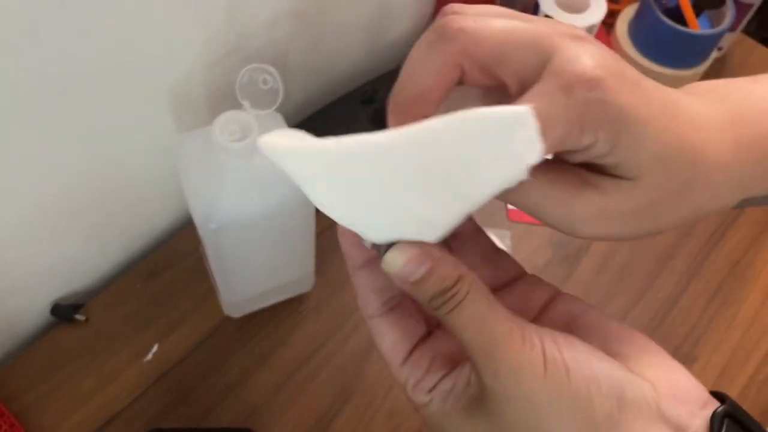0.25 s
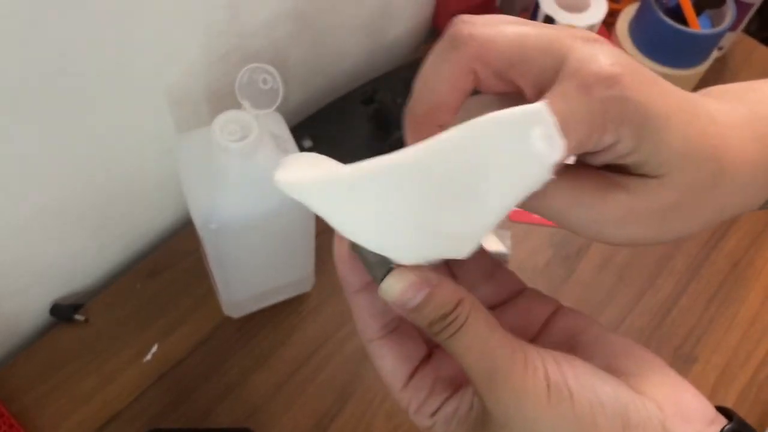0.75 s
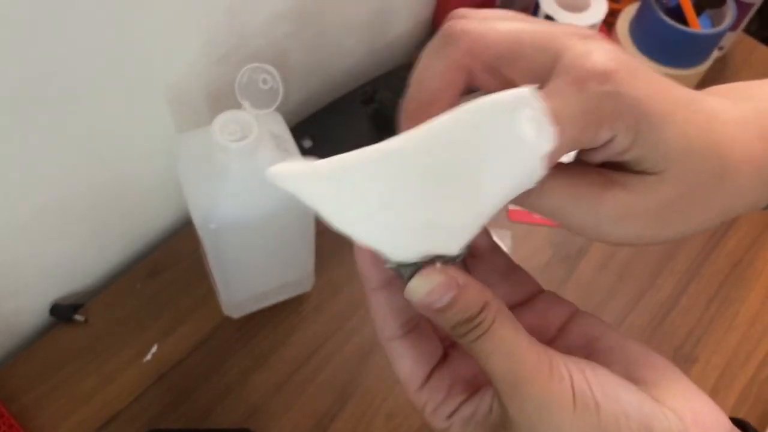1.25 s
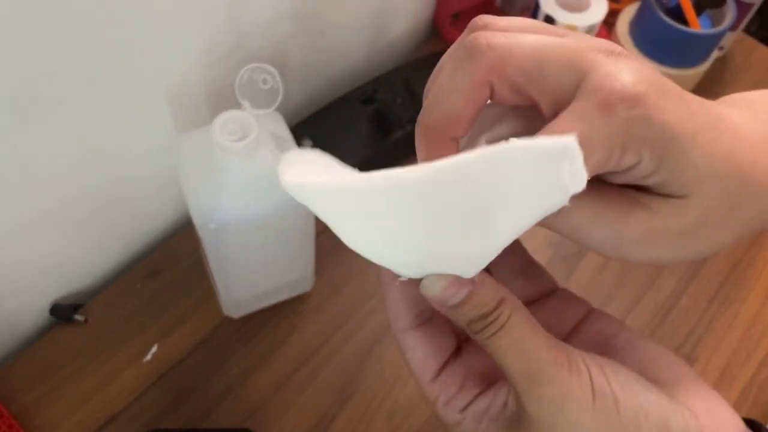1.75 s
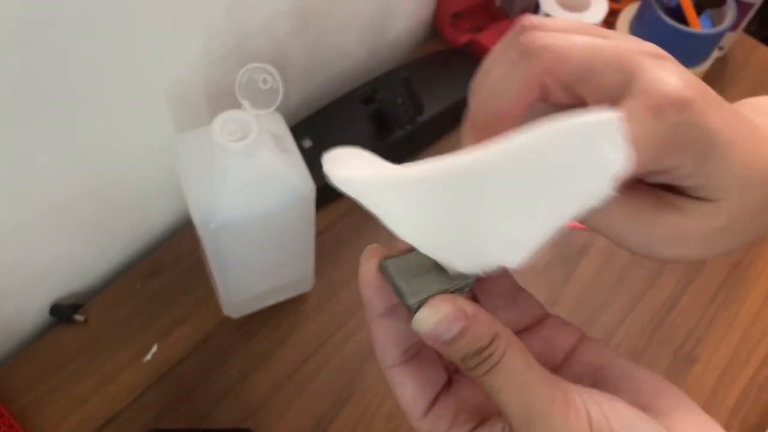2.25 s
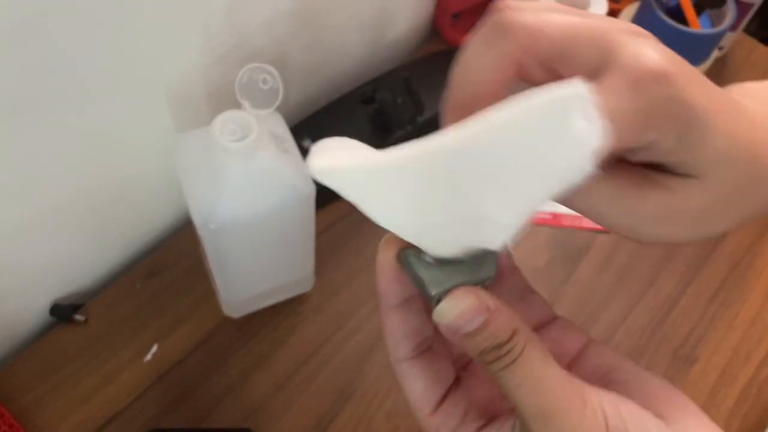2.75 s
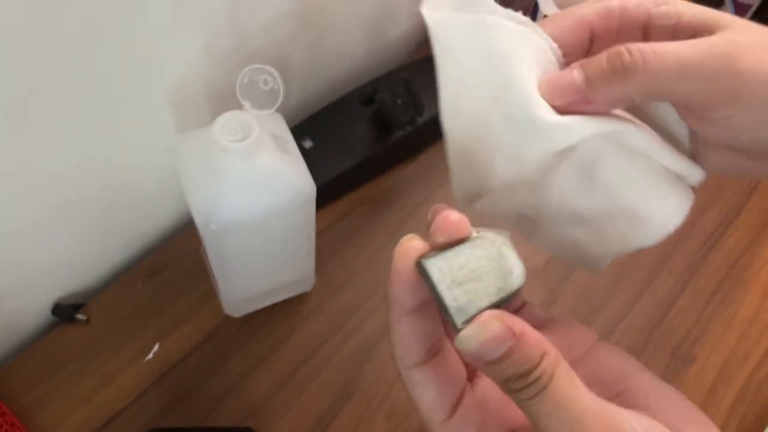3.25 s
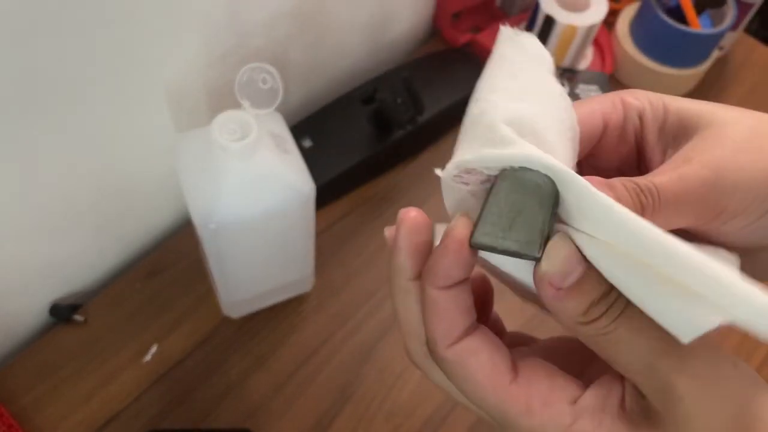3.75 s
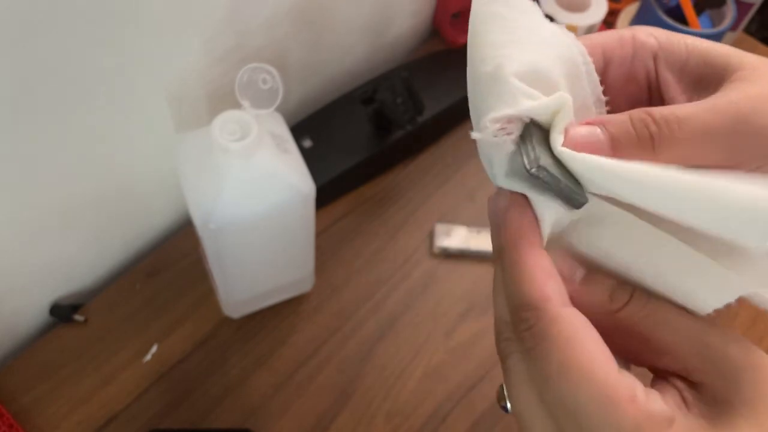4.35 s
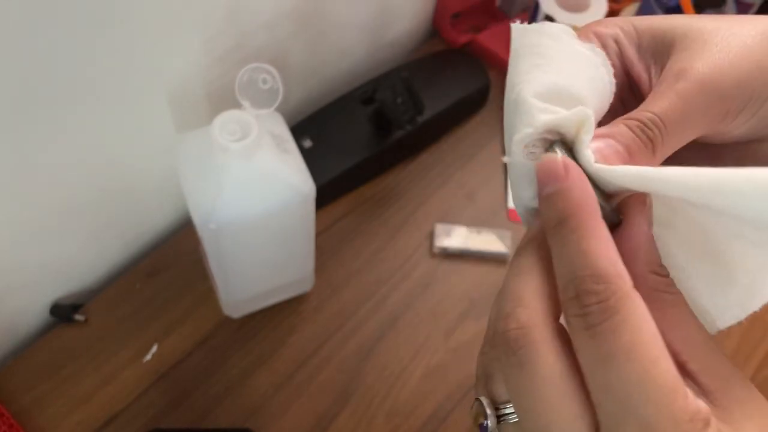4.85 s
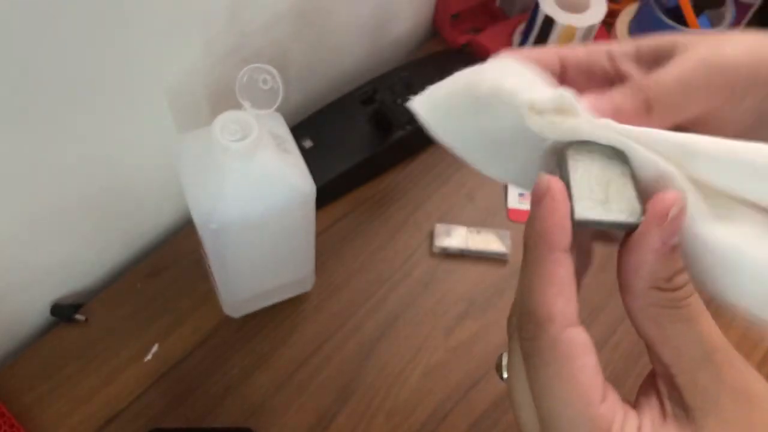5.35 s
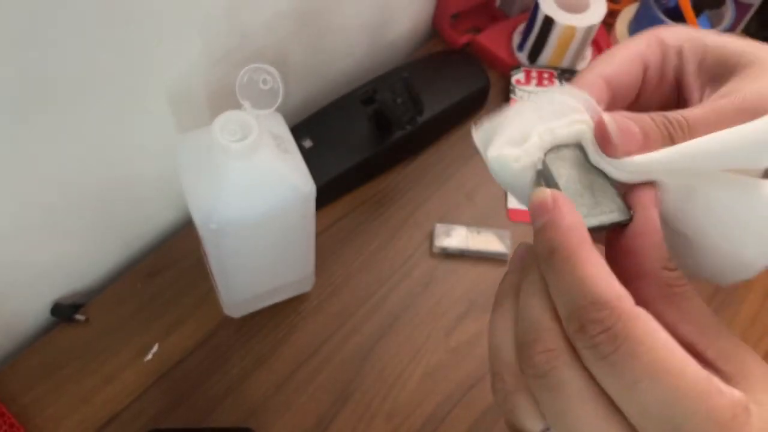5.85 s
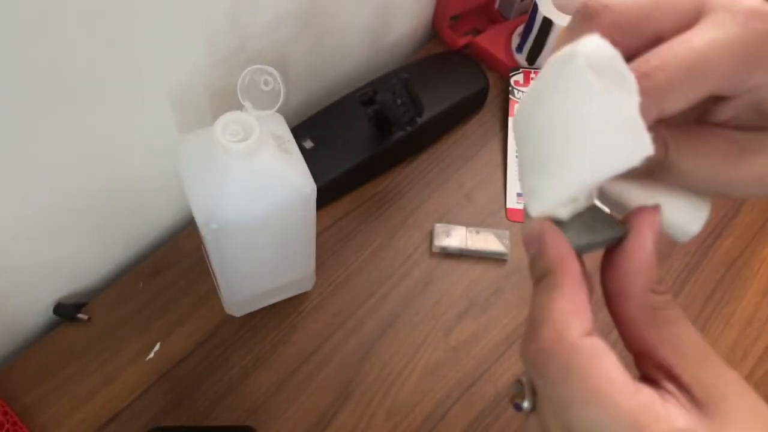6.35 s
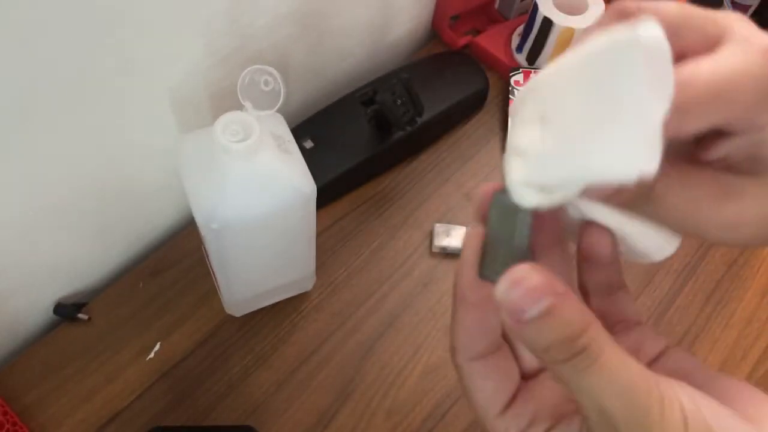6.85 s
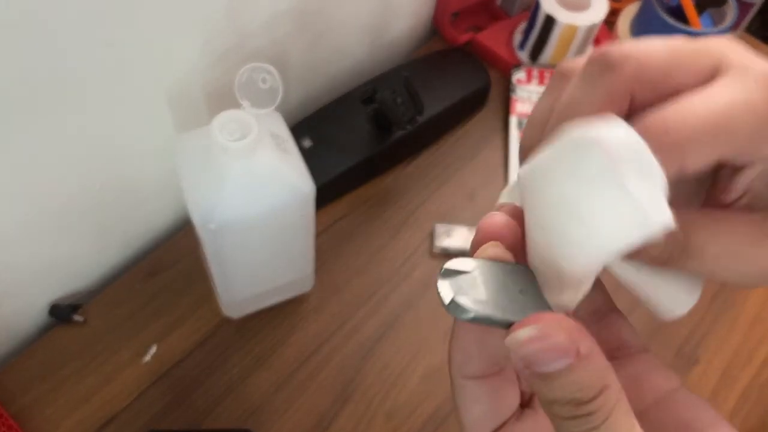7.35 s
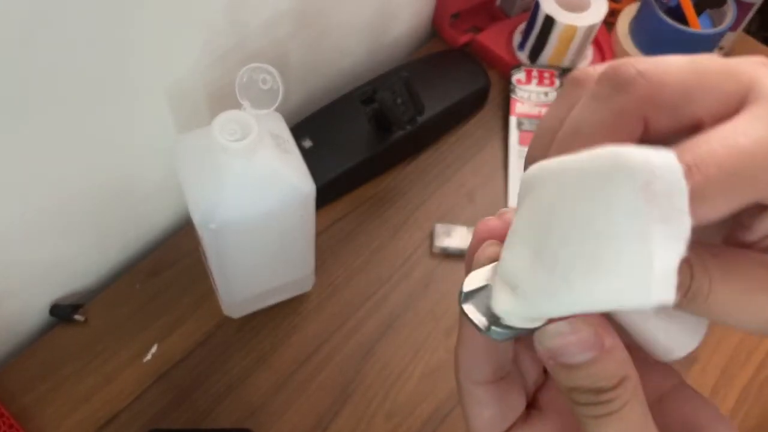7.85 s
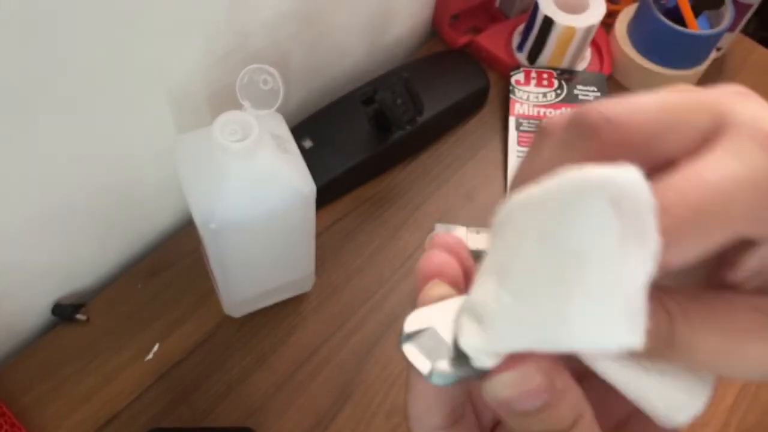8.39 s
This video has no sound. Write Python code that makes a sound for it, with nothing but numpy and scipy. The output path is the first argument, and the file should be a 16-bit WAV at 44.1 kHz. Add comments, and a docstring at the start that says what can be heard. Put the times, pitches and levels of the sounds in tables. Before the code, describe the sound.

A damp cloth scrubs a small metal piece in quick, jerky strokes close up, while an engine drones unevenly beyond the wall.

```python
"""Wet towel on metal, with an engine outside

A wet paper towel scrubs a small metal piece close to a phone: jerky noise, swelling with each stroke.
Short noise bursts make sharp paper snaps and a few low scuffs; fingers knock on the metal as dull thuds.
Beyond the wall an engine drones unevenly, made of wavering sines; a deeper boom joins late.
Filtered noise makes the low rumble, the soft swells of the moving hands and the faint room hiss.
"""
import sys
import numpy as np
from scipy import signal
from scipy.fft import rfft, irfft, next_fast_len
from scipy.io import wavfile
from scipy.ndimage import uniform_filter1d, map_coordinates

SR = 44100
rng = np.random.default_rng(int(sys.argv[2]) if len(sys.argv) > 2 else 0)


def unload_wav(signal):
    """Save mono or channel-first audio to the path in sys.argv[1] as 16-bit WAV at rate SR, clipped to [-1, 1]."""
    wavfile.write(
        sys.argv[1],
        SR,
        np.round(np.clip(np.atleast_2d(signal).T, -1, 1) * 32767).astype(np.int16),
    )


N = 380141

# Rubbing strokes: start t/s, length/s, level/dB, sheet voice against the fibres/dB,
# lean (change of level from start to end)/dB
STROKES = [(-.02, .14, -70, 0.5, 5), (.074, 0.078, -51, -7, -10.5), (0.205, 0.12, -62, -1, -11),
           (0.282, 0.061, -52.5, .5, 10), (0.329, .16, -56, -4.5, -22), (0.485, .1, -58.5, -4.5, 20),
           (0.613, 0.098, -60.5, -4.5, -11), (0.742, 0.069, -64.5, -1, 7), (0.845, 0.084, -63, -5, -2),
           (0.969, .092, -59, -1.5, 5), (1.084, .1, -57, -10, -4), (1.212, .1, -55, -0.5, 7),
           (1.341, 0.1, -57, -8, -6), (1.479, 0.11, -58, -0.5, 5), (1.604, .11, -58, -4.5, 1),
           (1.757, 0.096, -57.5, -0.5, 14), (1.876, 0.11, -55.5, -2, 9), (1.99, 0.091, -62.5, -10, 2),
           (2.108, .101, -61.5, -1, 34), (2.237, 0.12, -56.5, -4, -14), (2.362, 0.14, -54.5, -1, -12),
           (2.449, 0.15, -57.5, 0.5, -7), (2.579, 0.13, -61, -10.5, 19), (2.714, 0.099, -56, 0, -18),
           (2.835, 0.1, -56, -6.5, 3), (2.905, 0.1, -51.5, -0.5, 2), (2.965, 0.16, -55.5, -6.5, 6),
           (3.139, 0.066, -57.5, 0, 12), (3.198, 0.088, -56.5, -3, -7), (3.273, 0.096, -66.5, 4.5, 10),
           (3.369, 0.11, -63, 5.5, -2), (3.479, 0.22, -63, 6.5, -14), (3.621, 0.18, -60.5, -2.5, 6),
           (3.771, 0.23, -55.5, -1, -10), (4.002, 0.1, -57, 3, 3), (4.083, .11, -57, 2.5, -11),
           (4.163, .19, -57.5, 2, -24), (4.333, .11, -51.5, 1, -2), (4.43, 0.12, -49.5, -7.5, 13),
           (4.53, .07, -51, -1, -3), (4.626, 0.18, -68.5, 4.5, 28), (5.002, 0.11, -59, -7, 14),
           (5.107, 0.092, -60, 7, -8), (5.176, 0.11, -67, 4, -3), (5.331, .11, -58.5, -1.5, -18),
           (5.435, 0.095, -52, 2.5, 3), (5.51, 0.18, -62, 2, -1), (5.627, .12, -52, -2, -7.5),
           (5.712, 0.1, -51.5, -2, 7), (5.804, 0.12, -55.5, -1.5, -1), (5.951, 0.069, -50.5, -8, 19),
           (6.064, 0.057, -54.5, 0, -10), (6.137, 0.078, -65.5, -1, -11), (6.301, 0.059, -52, -7, -5),
           (6.401, 0.057, -54, -.5, 11), (6.498, 0.069, -45, -8.5, 3), (6.593, 0.079, -48.5, -3, 9),
           (6.709, 0.063, -48, -5.5, 4), (6.758, 0.09, -58, -12, -13), (6.897, 0.079, -67, 6.5, 24),
           (6.96, 0.19, -62.5, 2.5, -11), (7.202, 0.093, -59, -6, 15), (7.257, .13, -48.5, -2, 4),
           (7.37, .16, -61.5, 0.5, -10), (7.542, .14, -59, 5, -8), (7.686, .12, -50.5, -4.5, 8),
           (7.799, 0.08, -56, -5, -16), (7.871, 0.1, -53, 4.5, 6), (7.969, .11, -52, -6, -10),
           (8.075, 0.077, -50.5, 4, 4), (8.172, 0.087, -53.5, -0.5, -4), (8.272, 0.074, -52, .5, 1),
           (8.355, 0.073, -51.5, -9, -7), (8.448, 0.079, -52, 3.5, 1), (8.54, 0.073, -51, -8, -4)]
# The towel's rustle between strokes: t/s, level/dB
RUSTLE = [(0, -64), (.35, -69), (.6, -72.5), (.85, -84), (1.1, -72.5), (1.7, -73.5), (2, -68), (2.3, -72.5),
          (3, -69), (4.5, -62.5), (4.7, -71), (4.93, -72.5), (5.3, -67.5), (5.9, -62), (6.2, -70.5),
          (6.65, -61.5), (7.15, -79.5), (7.75, -64), (8.62, -65)]
# Fizz against the stroke, before the firmness rule in towel(): t/s, level/dB
FIZZ_LEVEL = [(0, 3.5), (.4, -1.5), (.8, 1), (1.6, 2), (2.2, -1), (2.8, 1.5), (3.1, -1.5), (3.35, -9.5),
              (3.7, -5.5), (4.5, -4.5), (4.7, -5), (5, -4), (5.7, -3.5), (6.75, -1.5), (6.95, -10.5),
              (7.3, 1), (7.55, -18), (7.75, 1.5), (8.1, -1), (8.62, 4.5)]
# Changes of grip: t/s, width/s, palm scuff level/dB, low swell level/dB
GRIPS = [(0, 0.016, -57, -58), (.32, 0.16, -67.5, -58.5), (1.16, 0.044, -63, -69), (1.36, 0.065, -65, -56),
         (1.53, 0.051, -67, -79), (1.65, 0.053, -61, -61), (2.18, 0.056, -72, -59.5),
         (2.29, 0.089, -64, -58.5), (2.95, .12, -62.5, -56), (3.069, 0.058, -61, -58.5),
         (3.431, 0.038, -58, -54.5), (3.57, 0.065, -53, -65), (3.74, 0.045, -64, -57.5),
         (3.96, 0.12, -59.5, -58), (4.1, 0.085, -60.5, -68), (4.35, 0.091, -58, -59), (4.54, .15, -59, -67),
         (4.74, 0.26, -67.5, -54.5), (5.04, 0.052, -63, -54.5), (5.2, 0.14, -62, -56.5),
         (5.37, .06, -71, -55), (5.49, 0.032, -64, -52), (6.56, .1, -69, -64), (6.95, .06, -78, -85),
         (7.331, 0.094, -62, -55), (7.58, 0.053, -78, -54.5), (7.76, .05, -73, -61),
         (8.05, 0.094, -75, -63), (8.12, .06, -59.5, -61), (8.25, 0.19, -67, -58), (8.49, 0.13, -67, -58.5)]
# Spectra of the rubbing, from low to high, each: f/Hz, level per Hz/dB
PALM_SPECTRUM = [(350, 14), (480, 10), (660, 11), (950, 2.5), (1400, -42)]
SHEET_SPECTRUM = [(500, -10.5), (900, -5), (1300, 0), (2000, 2), (2800, -3), (4500, -20.5)]
FIBRE_SPECTRUM = [(1300, -60), (2600, -7), (3500, 4.5), (5000, 3.5), (6500, 4.5), (7500, 5), (9500, -68)]
FIZZ_SPECTRUM = [(6000, -62.5), (7600, -3.5), (9000, 4.5), (11000, -1.5), (13000, -3), (15800, -3.5)]
# Resonances of the metal, damped by the fingers: f/Hz, width/Hz, gain/dB
METAL_MODES = [(2400, 82, 4.5), (5130, 90, -2), (1696, 27, 1.5)]
STROKE_SHAPE = 1.69  # power to which the half sine is raised
FIZZ_RISE, FIRM_DB = 0.25, -45  # dB of fizz gained for each dB a stroke is weaker than a firm one
PALM_DB, SWELL_DB = -70, -70  # base levels that the grips add to
PALM_FOLLOWS_DB = -25.5  # palm drag in each stroke, before the sheet level is added

# Engine: t/s, firing tone f/Hz, its level/dB, level of the shaft order above/dB, of the one below/dB
ENGINE = [(0, 82.9, -36, -47, -51), (.5, 81.76, -38, -46, -49), (.82, 77.8, -54, -59, -55),
          (1.15, 83.07, -39.5, -46.5, -62), (1.46, 84.4, -35, -46, -46), (1.68, 85, -49, -52, -62),
          (1.82, 82.16, -41, -45, -74), (1.9, 76.8, -54, -68, -52), (1.99, 77.2, -39, -55, -47),
          (2.11, 78.2, -46.5, -53.5, -57), (2.62, 84.8, -32.5, -50.5, -53), (3.24, 86.74, -37.5, -64, -57),
          (4.44, 87.35, -41.5, -55.5, -54), (5.32, 88.07, -42.5, -54, -61), (5.37, 86.7, -31.5, -51, -45),
          (5.48, 89.63, -41, -48.5, -59), (7.11, 87.74, -44.5, -59, -49), (7.27, 80.25, -38, -53, -38),
          (7.37, 82.8, -33.5, -57, -55), (7.59, 83.67, -53, -52, -47), (7.97, 85.55, -35.5, -61, -60),
          (8.33, 76.85, -44.5, -52, -45), (8.43, 74.9, -37, -44.5, -38), (8.5, 73.4, -52, -50, -45),
          (8.62, 74.2, -35, -52, -45)]
# Weaker engine tones: shaft order, level/dB, share of the firing tone's level swings followed
WEAK_ORDERS = [(2, -55.5, .1), (6, -62, 0.11), (8, -70, 0.38), (9, -70.5, .05), (12, -74, 0.86)]
# The seventh shaft order, which swells once: t/s, level/dB
SEVENTH_ORDER = [(0, -66), (4.05, -66), (4.2, -50), (4.45, -52), (4.6, -68), (8.62, -70)]

# Rumble: t/s, level/dB
RUMBLE_LEVEL = [(0, -53), (3.2, -52), (3.45, -47), (3.8, -53), (4.2, -49), (4.85, -50.5), (5.5, -47),
                (5.6, -51), (7, -53), (7.34, -42.5), (7.7, -53.5), (8.62, -47)]
# Spectra of the rumble, the hands' swells and the room hiss, each: f/Hz, level per Hz/dB
RUMBLE_SPECTRUM = [(22, -12), (35, 9), (60, 17), (100, 24.5), (130, 6), (170, 5.5), (200, 2.5),
                   (260, -23.5)]
SWELL_SPECTRUM = [(180, -0.5), (250, 5), (315, 5), (380, -18), (500, -25)]
HISS_SPECTRUM = [(200, 3), (400, 16.5), (800, 9.5), (1300, 10), (3000, -37), (6000, -10), (9000, -53),
                 (13000, -43), (15800, -9)]
# Room resonances: f/Hz, width/Hz, gain/dB
WALL_MODES = [(44, 9.1, 11.5), (153, 12, 5), (198.3, 6.5, 5), (323, 10, 4)]
HISS_DB = -77.5

# Short bursts, sharp paper snaps and a few low, dull scuffs: t/s, level/dB, centre f/Hz
BURSTS = [(.627, -48, 5000), (1.152, -52, 750), (1.372, -46, 761), (1.807, -40, 5000), (2.381, -38, 7700),
          (2.726, -42, 5970), (2.843, -38.5, 8050), (3.387, -40.5, 2840), (3.519, -41.5, 1299),
          (4.341, -41, 2420), (4.489, -41.5, 753), (4.564, -35, 7680), (5.341, -44, 2201),
          (5.494, -44, 1300), (5.649, -41, 2630), (6.415, -36.5, 6090), (6.624, -31.5, 5160),
          (6.921, -47.5, 1911), (6.945, -40, 999), (7.032, -43.5, 1900), (7.294, -36, 1897),
          (7.331, -33, 2534), (7.566, -37.5, 3870), (7.701, -40, 2440), (7.981, -36, 7580)]
BURST_T60_S, BURST_CYCLES = 0.022, 39  # the rustle's decay is this time plus this many cycles
SPIKE_T60_S, RUSTLE_DB = 0.00071, -5.5  # decay of the first instant; the rustle's level against it

# Fingers on metal: t/s, level/dB, left against right/dB
KNOCKS = [(3.416, -42, -1.5), (3.555, -36, -10), (3.569, -40.5, 21), (3.979, -48, 4), (4.298, -55, 6),
          (4.54, -40, -1), (5.037, -44, -1.5), (5.492, -35, -1), (7.327, -45, 5), (7.91, -47.5, -1)]
# Spectrum of the thud: f/Hz, level per Hz/dB
KNUCKLE_SPECTRUM = [(120, -1), (250, 5), (500, -1), (900, -3.5), (2000, -24), (4000, -28)]
KNOCK_T60_S, KNOCK_RISE_S = 0.024, 0.00083
CRACK_DB, CRACK_T60_S = -8.5, 0.0064  # the first bright contact, against the knock level

# Late boom: t/s, level/dB
BOOM = [(6.4, -68), (6.6, -36.5), (6.8, -40), (7.07, -39.5), (7.14, -32.5), (7.3, -38.5), (7.6, -55),
        (7.69, -27.5), (7.77, -51), (7.83, -39.5), (8.2, -33.5), (8.33, -47), (8.41, -33), (8.54, -51),
        (8.62, -31)]
BOOM_HZ, BOOM_SAG_HZ_PER_S = 51.5, 1.4

# Likeness of left and right: f/Hz, likeness (1 is the same)
ALIKE = [(60, 0.87), (150, 0.93), (300, 0.68), (600, 0.3), (1200, 0.59), (2500, 0.9), (5000, 1),
         (7200, 0.99), (8000, 0.98), (15000, 0.99)]
# Lead of left over right: f/Hz, phase/rad
LEFT_LEAD = [(250, -0.026), (450, 0.2), (700, 0.39), (1000, 0.49), (1600, -0.073), (2900, 1.05),
             (4000, 1.6), (5200, 0.64), (7000, 1.85), (7700, -0.077)]
# Left against right: f/Hz, level/dB
LEFT_TILT = [(200, -1.4), (700, 2), (1400, -0.5), (3000, 2.5), (6000, 3.5), (8000, 0)]
TOP_HZ = 15900


def amp(db):
    """Turn a level in dB into a gain."""
    return 10 ** (np.asarray(db) / 20)


def unit(x):
    """Scale to an average strength (rms) of 1."""
    return x / np.sqrt(np.mean(x ** 2) + 1e-20)


def along(points, hz):
    """Read a (frequency, value) table at hz, on a log frequency axis."""
    f, v = np.transpose(points)
    return np.interp(np.log(hz + 1), np.log(f + 1), v)


def curves(rows):
    """Join table rows with straight lines: one curve for each column after the time."""
    s, *columns = np.transpose(rows)
    return [np.interp(np.arange(N) / SR, s, column) for column in columns]


def wobble(rate):
    """A smooth random curve with rate new random points a second."""
    knots = rng.standard_normal(int(N * rate / SR) + 4)
    return map_coordinates(knots, [np.arange(N) * rate / SR])


def filtered(x, response):
    """Multiply the spectrum of x by a response that depends on frequency."""
    m = next_fast_len(x.shape[-1] + 8192)  # spare room for the filter's tail
    spectrum = rfft(x, m) * response(np.fft.rfftfreq(m, 1 / SR))
    return irfft(spectrum, m)[..., :x.shape[-1]]


def coloured(x, spectrum):
    """Shape x by a spectrum, at rms 1; cut below half the first frequency."""
    return unit(filtered(x, lambda hz: amp(along(spectrum, hz)) * (hz > spectrum[0][0] / 2)))


def peaks(modes):
    """A flat response with gentle resonances standing on it."""
    def response(f):
        return 1 + sum((amp(db) - 1) / (1 + (2 * (f - centre) / width) ** 2) for centre, width, db in modes)
    return response


def patchy(pair, patchy_db):
    """Random patches of gain in time and frequency, the same for both signals."""
    z = signal.stft(pair, nperseg=512)[2]
    field = rng.standard_normal(z.shape[1:])
    field = uniform_filter1d(field, size=3, axis=0)  # smooth over frequency
    field = uniform_filter1d(field, size=7, axis=1)  # smooth over time
    return signal.istft(z * amp(patchy_db * unit(field)), nperseg=512)[1][:, :N]


def tone(hz, drift, flutter_db, rate):
    """A sine of rms 1 that wavers in pitch (drift in Hz) and in level."""
    phase = 2 * np.pi * np.cumsum(hz + drift * wobble(rate)) / SR
    return unit(amp(flutter_db * wobble(rate)) * np.sin(phase))


def grips(column, base_db):
    """Bell-shaped swells at each change of grip, added in power to a steady base."""
    t = np.arange(N) / SR
    power = amp(base_db) ** 2
    for row in GRIPS:
        power = power + amp(row[column]) ** 2 * np.exp(-(2 * (t - row[0]) / row[1]) ** 2)
    return np.sqrt(power)


def towel():
    """Wet fibres slip in dense tiny jerks; the hand's speed swells and dies within each stroke."""
    rest = amp(curves(RUSTLE)[0]) ** 2
    power = np.zeros(N)
    for s, length, db, _, lean_db in STROKES:
        at = np.arange(max(round(s * SR), 0), min(round((s + length) * SR), N))
        u = np.clip((at / SR - s) / length, 0, 1)  # progress through the stroke
        power[at] += amp(db + lean_db * (u - .5)) ** 2 * np.sin(np.pi * u) ** STROKE_SHAPE
    middles = [(s + length / 2, db, sheet) for s, length, db, sheet, _ in STROKES]
    stroke_db, sheet_db = curves(middles)
    fizz_db = curves(FIZZ_LEVEL)[0] - FIZZ_RISE * (stroke_db - FIRM_DB)

    # A random level for every sample makes the noise jerky
    jerk_db = 2.16 * rng.standard_normal(N) + 0.38 * wobble(400) + 1.6 * wobble(60)
    slips = patchy(rng.standard_normal((2, N)) * amp(jerk_db), patchy_db=2.5)
    slips = filtered(slips, peaks(METAL_MODES))
    body = coloured(slips, FIBRE_SPECTRUM) + amp(sheet_db) * coloured(slips, SHEET_SPECTRUM)
    fizz_gain = amp(fizz_db) * np.sqrt(power + amp(-4.5) * rest)  # slow contact is duller
    fizz = fizz_gain * coloured(slips, FIZZ_SPECTRUM)
    drag = amp(PALM_FOLLOWS_DB + sheet_db) ** 2 * power
    palm_gain = np.sqrt(grips(column=2, base_db=PALM_DB) ** 2 + drag)
    return np.sqrt(power + rest) * body + fizz + palm_gain * coloured(slips, PALM_SPECTRUM)


def engine():
    """Four firings a shaft cycle; uneven cylinders leave the neighbouring orders audible."""
    hz, firing_db, upper_db, lower_db = curves(ENGINE)
    shaft = hz / 4
    drone = amp(firing_db) * tone(hz, drift=0.71, flutter_db=1.5, rate=10.0)
    drone += amp(upper_db) * tone(5 * shaft, drift=1.5, flutter_db=2.5, rate=12)
    drone += amp(lower_db) * tone(3 * shaft, drift=3.5, flutter_db=4, rate=14)
    swing_db = firing_db - firing_db.mean()
    for order, db, share in WEAK_ORDERS:
        drone += amp(db + share * swing_db) * tone(order * shaft, drift=2.54, flutter_db=6, rate=7)
    seventh = tone(7 * shaft, drift=1.5, flutter_db=2.5, rate=6)
    return drone + amp(curves(SEVENTH_ORDER)[0]) * seventh


def background():
    """Low rumble and the hands' soft swells, both coloured by the walls, over the room's hiss."""
    def noise(spectrum):
        return coloured(rng.standard_normal((2, N)), spectrum)
    rumble = amp(curves(RUMBLE_LEVEL)[0]) * noise(RUMBLE_SPECTRUM)
    swells = grips(column=3, base_db=SWELL_DB) * noise(SWELL_SPECTRUM)
    return filtered(rumble + swells, peaks(WALL_MODES)) + amp(HISS_DB) * noise(HISS_SPECTRUM)


def snaps_and_scuffs():
    """Short bursts in a broad resonance: sharp paper snaps and a few low, dull scuffs."""
    out = np.zeros((2, N + SR))
    t = np.arange(SR // 10) / SR
    for s, db, hz in BURSTS:
        resonance = lambda f: 1j * f * hz / (hz * hz - f * f + .8j * f * hz)
        burst = unit(filtered(rng.standard_normal((2, len(t))), resonance))
        rustle = amp(RUSTLE_DB - 60 * t / (BURST_T60_S + BURST_CYCLES / hz))  # low bursts last longer
        spike = amp(-60 * t / SPIKE_T60_S)
        out[:, round(s * SR):][:, :len(t)] += amp(db) * burst * (rustle + spike)
    return out[:, :N]


def knocks():
    """Fingers bump the metal: a dull thud with no ring, and a brief bright crack on contact."""
    out = np.zeros((2, N + SR))
    t = np.arange(SR // 8) / SR
    for s, db, pan_db in KNOCKS:
        thud = coloured(rng.standard_normal(len(t)), KNUCKLE_SPECTRUM)
        thud = thud * amp(-60 * t / KNOCK_T60_S) * (1 - np.exp(-t / KNOCK_RISE_S))
        crack = coloured(rng.standard_normal(len(t)), SHEET_SPECTRUM)
        crack = crack * amp(CRACK_DB - 60 * t / CRACK_T60_S)
        pan = amp([[pan_db / 2], [-pan_db / 2]])
        out[:, round(s * SR):][:, :len(t)] += amp(db) * (thud + crack) * pan
    return out[:, :N]


def boom():
    """A deep wavering sine that fades in late and slowly sags in pitch."""
    start = BOOM[0][0]
    boom_db, = curves([(start - .1, -90)] + list(BOOM))
    hz = BOOM_HZ - BOOM_SAG_HZ_PER_S * (np.arange(N) / SR - start)  # BOOM_HZ holds at the start
    return amp(boom_db) * tone(hz, drift=1.49, flutter_db=3.5, rate=11)


def left_and_right(pair):
    """Mix two unrelated signals into left and right, with a set likeness, level and phase by frequency."""
    def share(hz):
        turn = np.arccos(np.clip(along(ALIKE, hz), -1, 1)) / 2
        return np.array([np.cos(turn), np.sin(turn)])

    def balance(hz):
        # Each side takes half of the level and phase difference
        half = amp(along(LEFT_TILT, hz) / 2) * np.exp(.5j * along(LEFT_LEAD, hz))
        return np.array([half, 1 / half])
    mid, side = filtered(pair, share)
    return filtered(np.array([mid + side, mid - side]), balance)


def scene():
    """All the sounds together in stereo; the engine and boom are nearly alike on both sides."""
    near = left_and_right(towel() + background() + snaps_and_scuffs())
    bass = (engine() + boom()) * amp([[-.1], [.1]])
    return near + knocks() + bass


def record(dry):
    """The phone keeps nothing above its band limit."""
    return filtered(dry, lambda hz: hz < TOP_HZ)


dry = scene()
out = record(dry)
unload_wav(out)
```